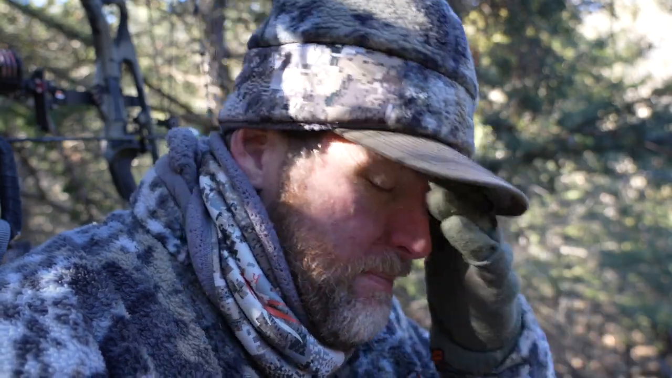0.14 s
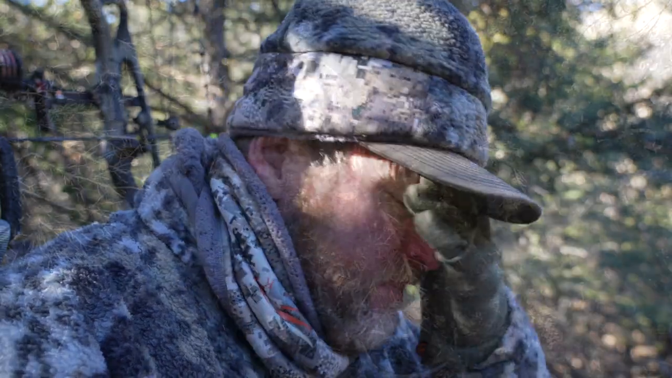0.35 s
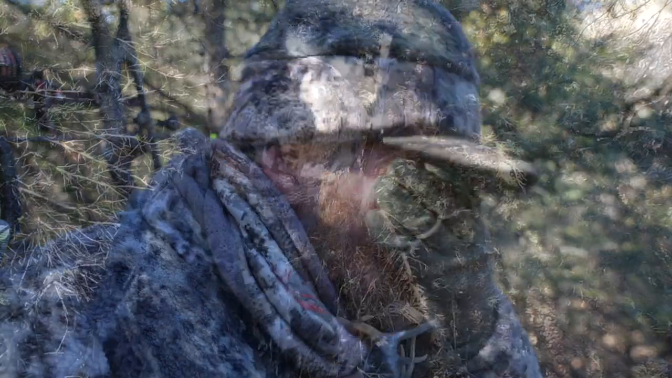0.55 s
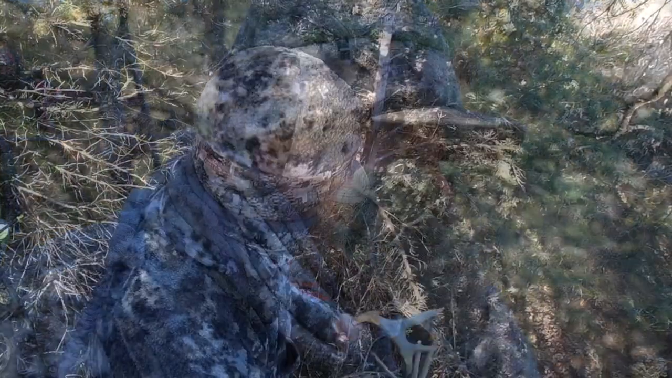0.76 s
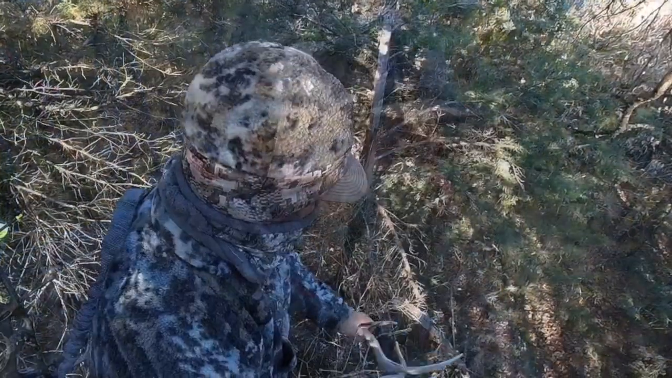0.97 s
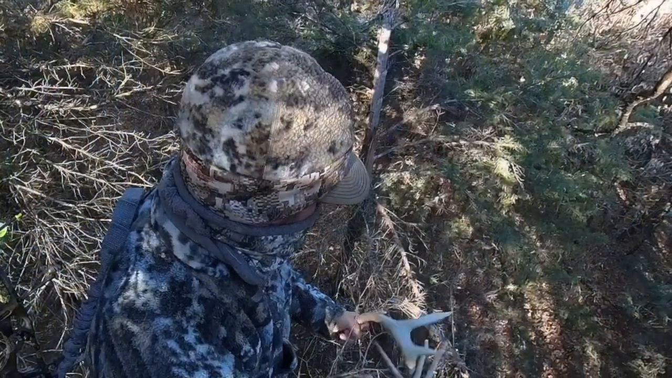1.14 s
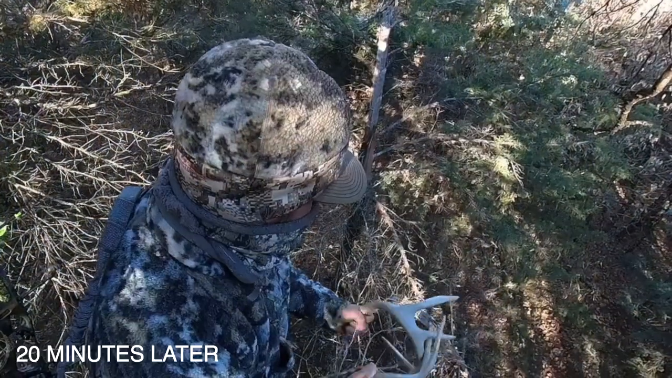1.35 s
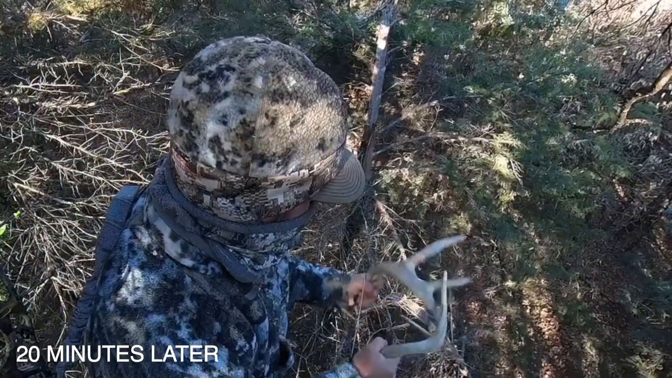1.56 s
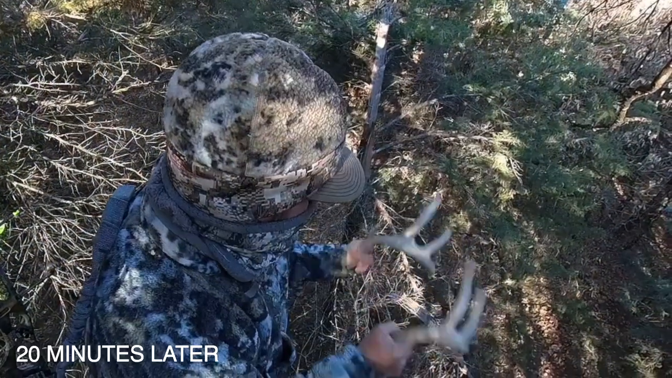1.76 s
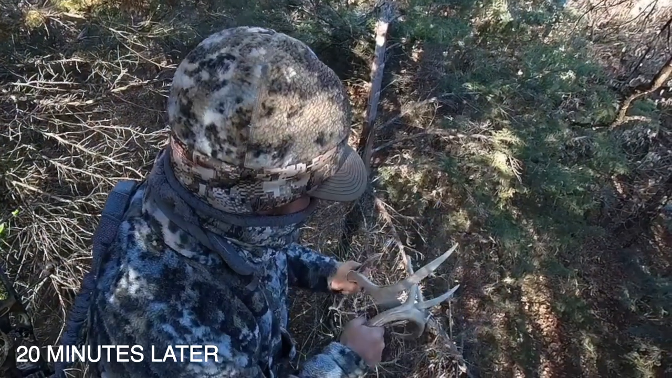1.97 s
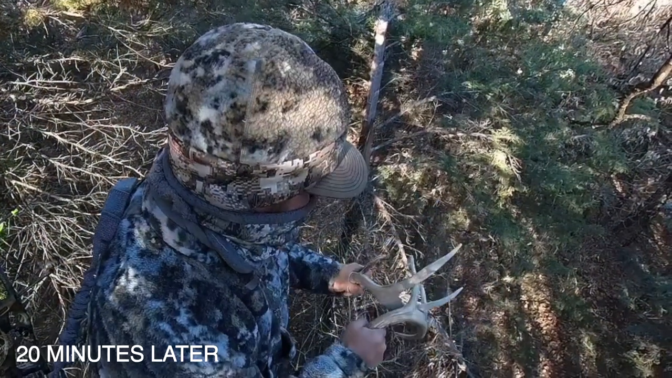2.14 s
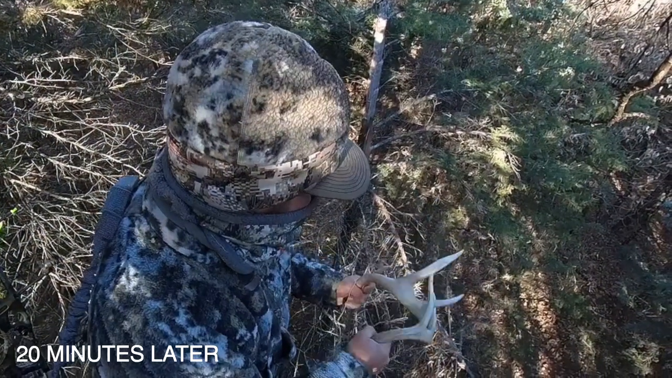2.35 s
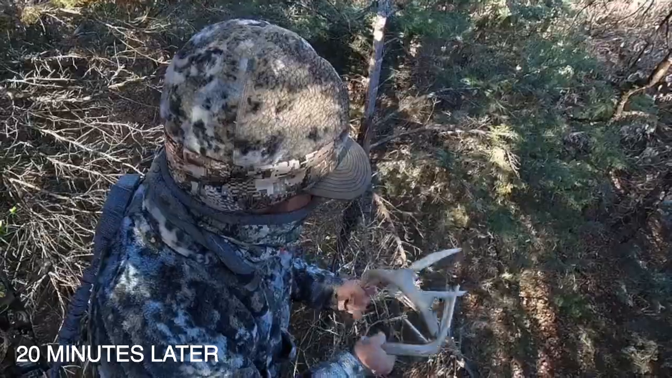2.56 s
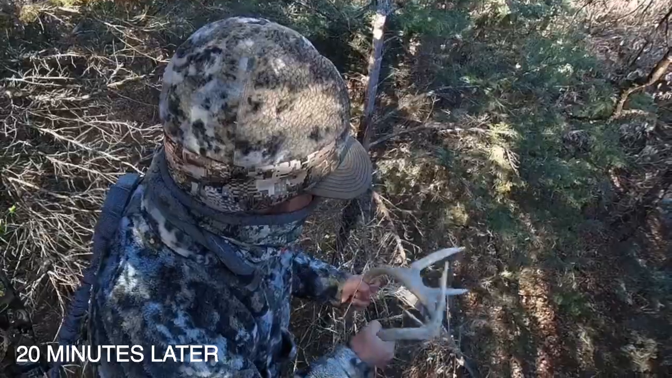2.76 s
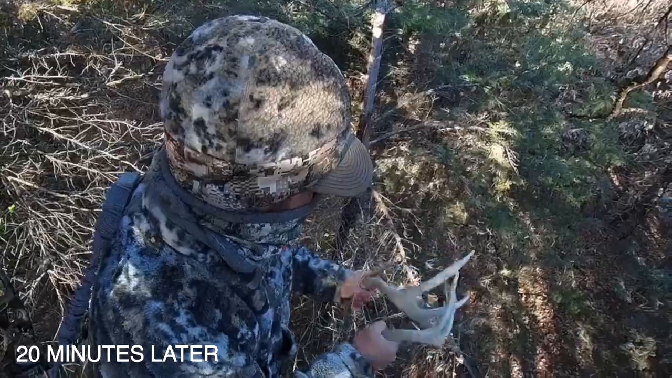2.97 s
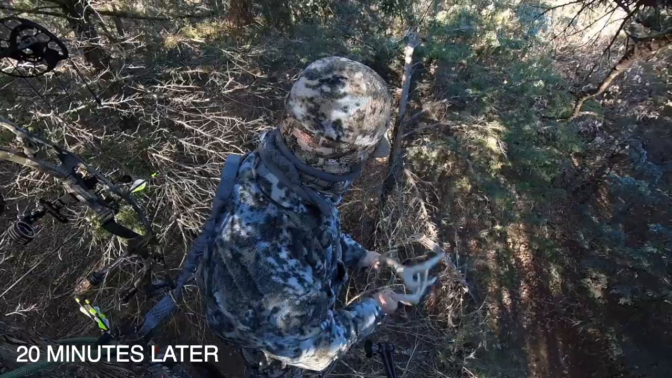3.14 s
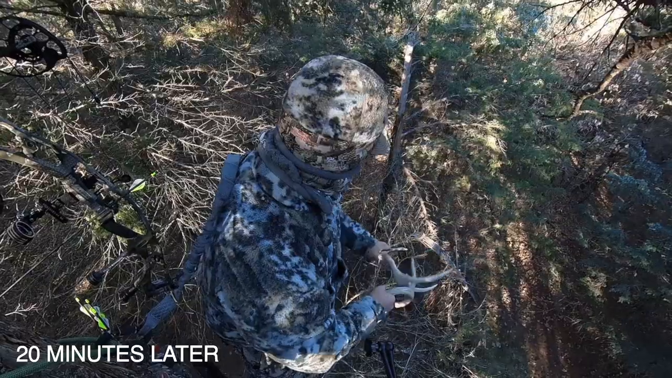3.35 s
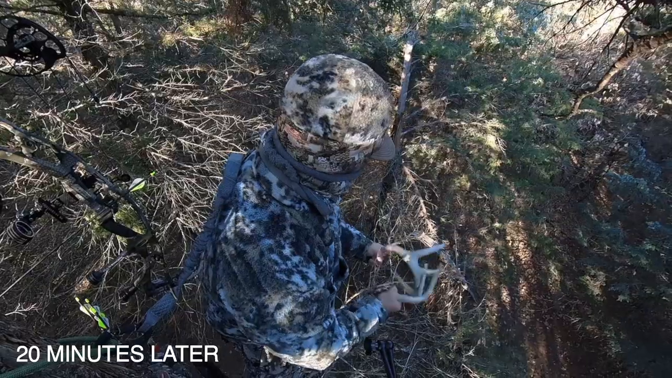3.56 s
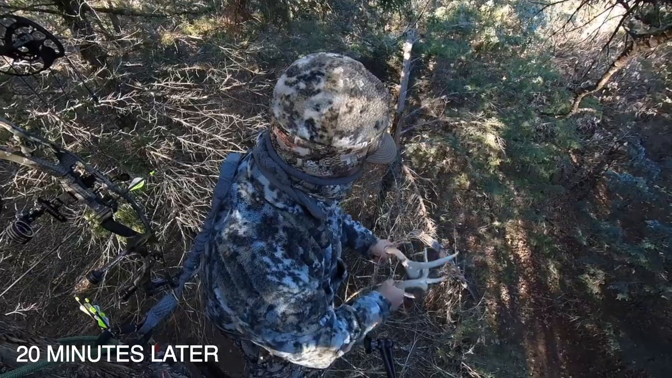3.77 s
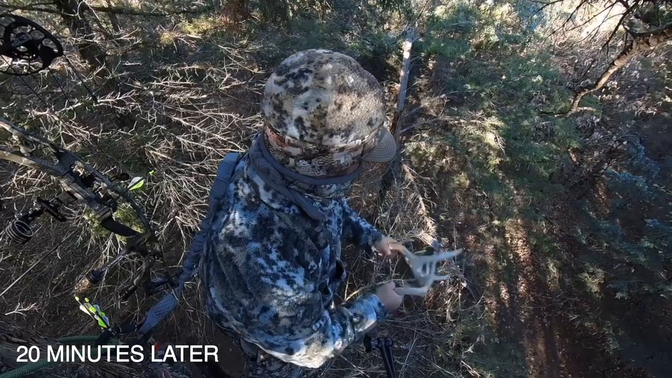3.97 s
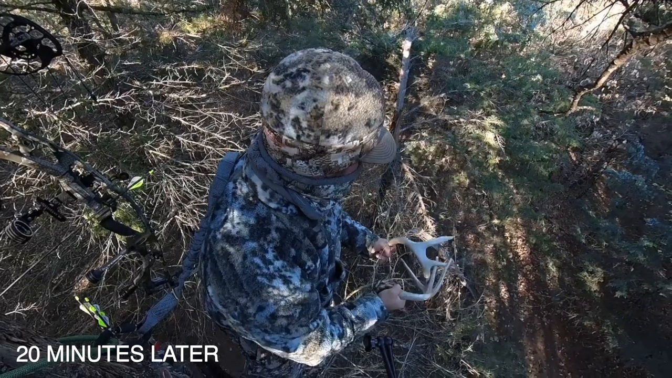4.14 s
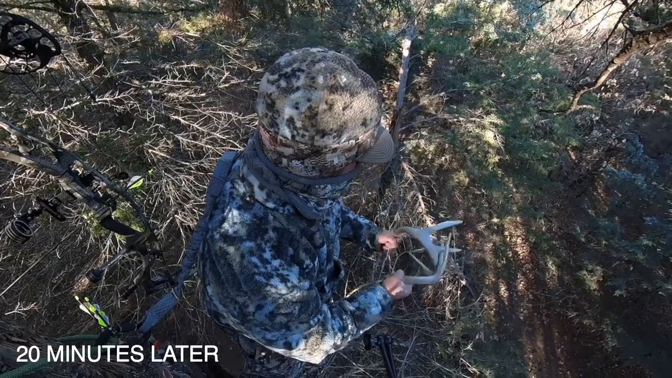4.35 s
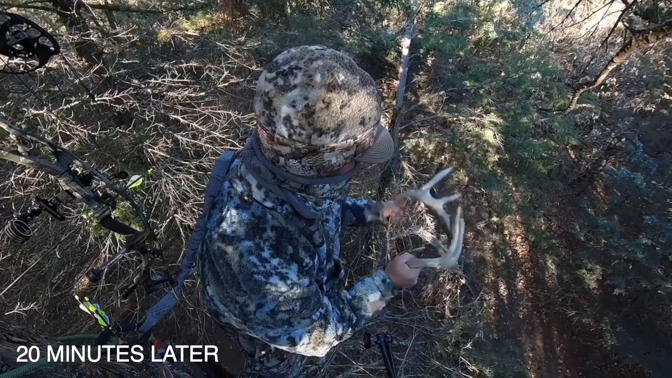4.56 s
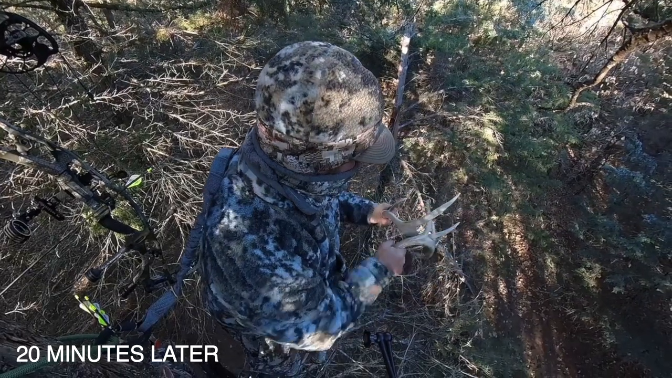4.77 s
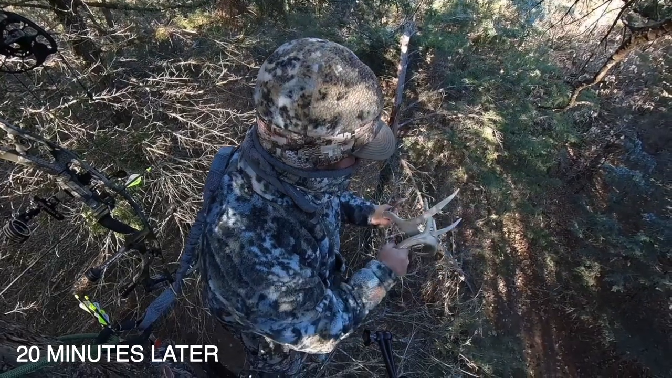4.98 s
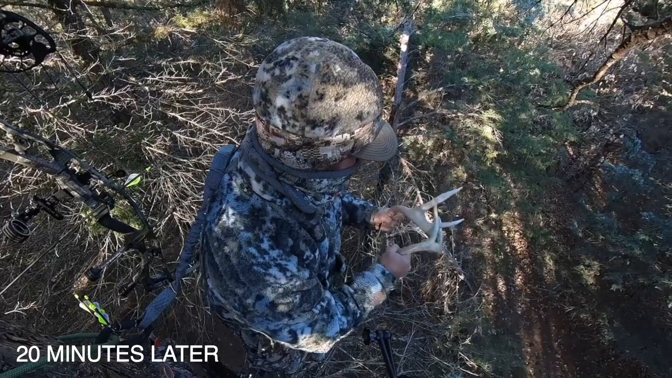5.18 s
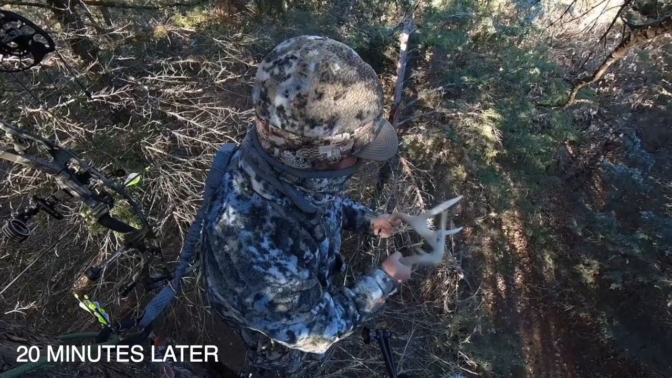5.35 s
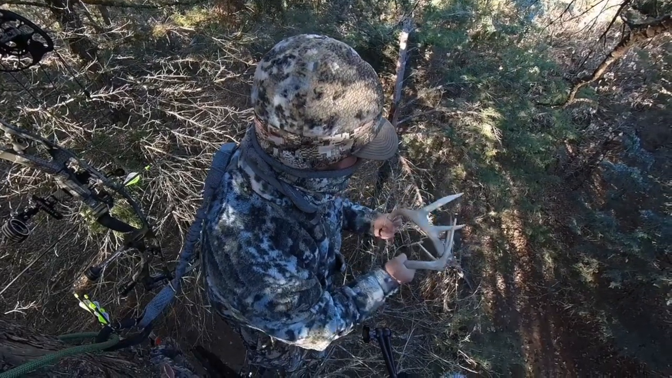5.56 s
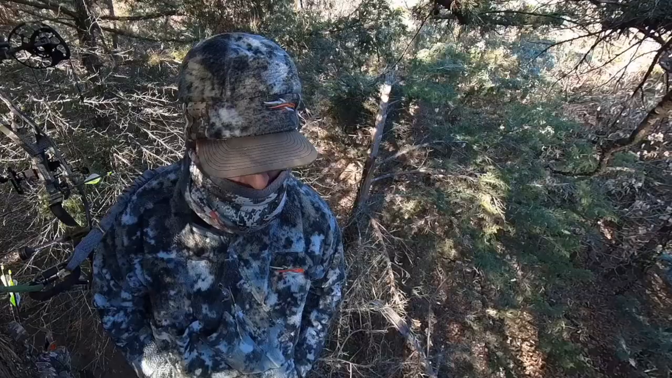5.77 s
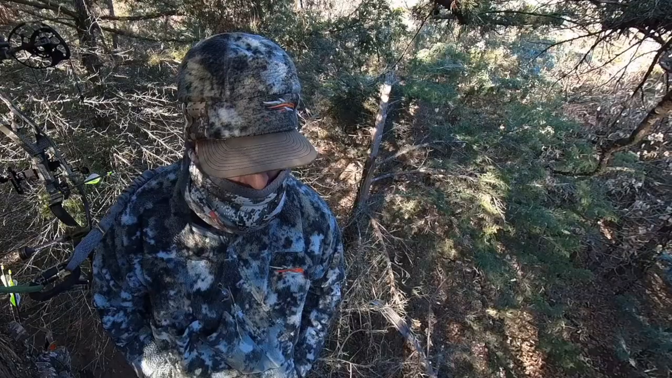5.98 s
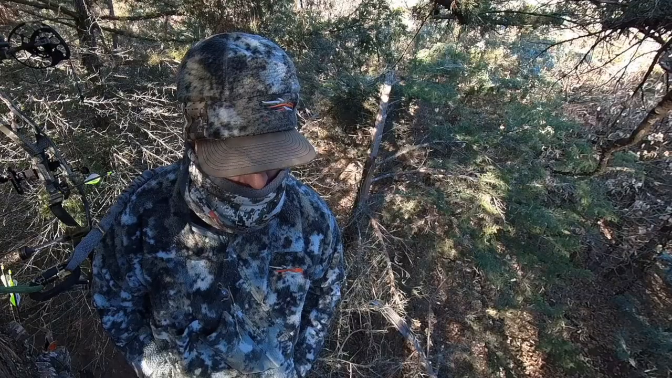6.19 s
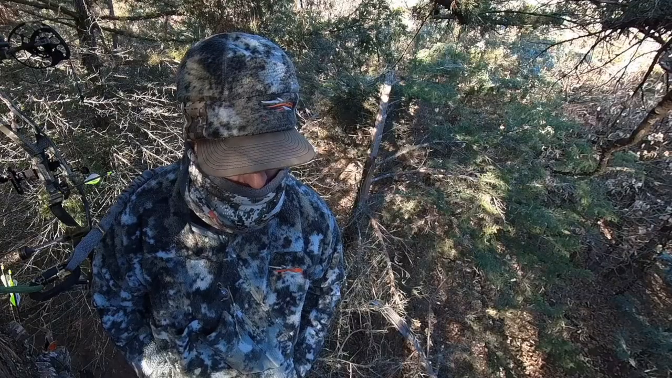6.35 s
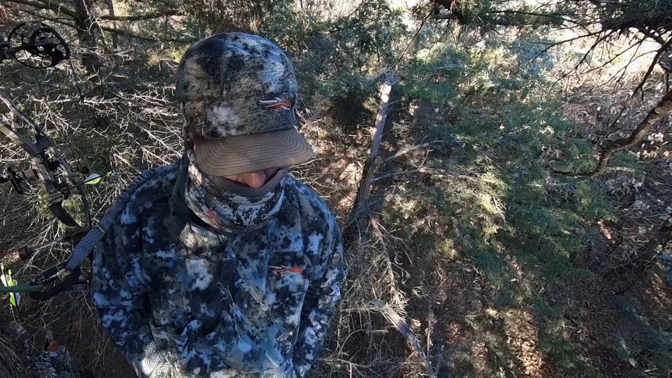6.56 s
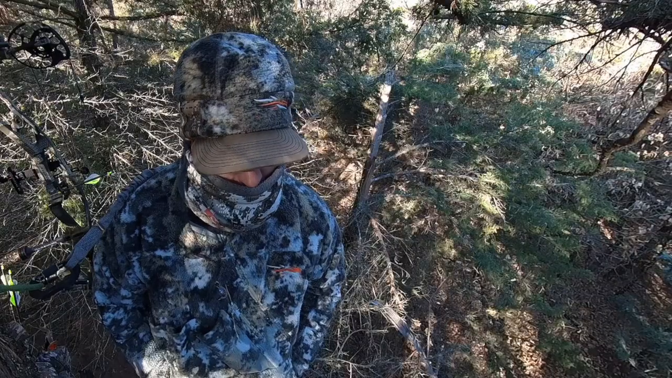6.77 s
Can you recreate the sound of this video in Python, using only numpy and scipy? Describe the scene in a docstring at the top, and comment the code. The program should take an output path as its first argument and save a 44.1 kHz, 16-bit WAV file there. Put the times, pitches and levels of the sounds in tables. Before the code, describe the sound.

Antlers clack and grind together up close in quiet woodland, first fading in through rustling cloth, then rattling harder before only soft wind and drone remain.

```python
"""Deer antlers rattled in woodland

Close to a small microphone, a pair of antlers is clacked and ground together in a quiet wood.
Each blow is a broad contact and a decaying chatter of ticks, which rings the modes of the bone.
Around it the trunks return a short noisy wash, over a far drone, a smooth hiss and a wind rumble.
Most of the flurry sounds twice, the first time fading in while a rustle of cloth, made of
filtered noise, fades out."""
import sys
import numpy as np
from scipy import signal
from scipy.fft import rfft, irfft, next_fast_len
from scipy.io import wavfile
from scipy.ndimage import uniform_filter1d, minimum_filter1d

SR = 44100
rng = np.random.default_rng(int(sys.argv[2]) if len(sys.argv) > 2 else 0)


def to_wav(s):
    """Save 16-bit WAV."""
    ch = np.atleast_2d(s).T  # columns
    pcm = np.round(np.clip(ch, -1, 1) * 32767)  # PCM
    wavfile.write(sys.argv[1], SR, pcm.astype(np.int16))


N = 300762


def undb(db):
    """Decibels to amplitude."""
    return 10 ** (np.asarray(db) / 20)


def curve(rows):
    """Columns of a (time_s, value, ..) table at every sample."""
    time_s, *columns = np.transpose(rows)
    return [np.interp(np.arange(N) / SR, time_s, column) for column in columns]


def colour(x, points):
    """Filter by (pitch_hz, level_db) points on a log-frequency axis."""
    size = next_fast_len(x.shape[-1])
    pitch_hz, level_db = np.transpose(points)
    bins_hz = np.arange(size // 2 + 1) * SR / size
    gain = undb(np.interp(np.log(bins_hz + 1), np.log(pitch_hz), level_db))
    return irfft(rfft(x, size) * gain, size)[..., :x.shape[-1]]


def noise(points):
    """Coloured noise of rms 1."""
    x = colour(rng.standard_normal(N), points)
    return x / x.std()


def walk(rate_hz):
    """Random levels joined by straight slopes, rate_hz of them a second; spread about a quarter."""
    hold = int(SR / rate_hz)
    steps = np.repeat(rng.standard_normal(N // hold + 1), hold)
    return 0.32 * uniform_filter1d(steps, hold)[:N]


def ring(pitch_hz, gains, t60_s, t):
    """Modes after one tick: decaying sines with t60_s at 3500 Hz; low modes last longer."""
    pitch_hz = np.c_[pitch_hz]
    decay = 1000. ** (-t / (t60_s * (3500 / pitch_hz) ** 0.14))
    return gains @ (np.sin(2 * np.pi * pitch_hz * t) * decay)


# stretches whose sounds are heard only once: start_s, end_s
HEARD_ONCE = [(0, 3.5), (3.75, 3.82), (3.96, 3.99), (4.015, 4.035), (4.28, 4.4)]


def hearing(start_s):
    """Row for a sound by its start: 0 for what sounds once, 1 for what sounds twice."""
    return int(not any(a <= start_s < b for a, b in HEARD_ONCE))


# each knock of antler on antler, close to the microphone:
# start_s, level_db, first_ring_hz, second_ring_hz, third_ring_hz, chatter_t60_ms (8 at least)
ANTLER_BLOWS = [(2.832, -51.5, 3560, 880, 5220, 16), (2.9125, -12, 5750, 2684, 4600, 32),
                (3.0033, -45, 6470, 3330, 4316, 20), (3.0228, -15, 6600, 3194, 4510, 22),
                (3.0325, -13, 4170, 6030, 3410, 35), (3.0746, -40, 6350, 4650, 3120, 23),
                (3.0951, -13.5, 6510, 4540, 3410, 39), (3.133, -31, 5700, 3810, 2524, 24),
                (3.1428, -12, 4630, 5270, 6090, 23), (3.1499, -11, 3540, 4225, 5290, 52),
                (3.1536, -17, 3480, 1890, 5100, 25), (3.1642, -5, 4580, 1760, 2830, 77),
                (3.1709, -9, 4470, 1670, 2574, 20), (3.1861, -27.5, 2150, 1350, 4450, 46),
                (3.2051, -14, 5880, 3770, 4960, 54), (3.2649, -27, 3310, 1837, 4620, 48),
                (3.3061, -11, 3510, 4330, 5100, 43), (3.3178, -20, 3580, 2515, 960, 20),
                (3.325, -13, 1980, 5120, 994, 49), (3.3535, -1, 4237, 3083, 1760, 43),
                (3.3706, -20, 2840, 1103, 1995, 80), (3.387, -4, 7090, 5605, 4060, 45),
                (3.3996, -13.5, 5030, 3570, 2000, 25), (3.4331, -40.5, 5950, 4040, 6770, 35),
                (3.4538, -10.5, 5920, 4040, 6600, 28), (3.465, -29, 5890, 4606, 3964, 20),
                (3.528, -14, 2297, 4580, 1260, 62), (3.5534, -16, 4730, 3494, 925, 25),
                (3.568, -3.5, 4740, 2200, 3690, 42), (3.578, -14.5, 6255, 4486, 5640, 12),
                (3.6932, -37.5, 2280, 3180, 1066, 19), (3.702, -40.5, 6310, 4414, 5850, 15),
                (3.7227, -9.5, 6486, 4433, 5910, 33), (3.7298, -20.5, 2390, 4765, 1743, 23),
                (3.7907, -11.5, 4640, 2750, 1954, 34), (3.7976, -8.5, 3900, 3575, 1730, 42),
                (3.9062, -38.5, 2620, 860, 4634, 40), (3.9173, -31.5, 2067, 940, 4260, 47),
                (3.9266, -12.5, 4505, 3550, 2326, 13), (3.9675, -18, 2900, 1874, 4350, 47),
                (3.9933, -27, 1530, 3290, 2338, 72), (4.002, -21, 2354, 4530, 1300, 73),
                (4.0056, -21, 5340, 2260, 4370, 16), (4.02, -18, 4320, 2830, 3650, 60),
                (4.0963, -45, 3093, 1452, 2410, 26), (4.1117, -36.5, 970, 2670, 2040, 40),
                (4.1156, -9.5, 2936, 4785, 2415, 44), (4.143, -13, 2564, 4516, 1754, 62),
                (4.1496, -5, 3694, 2370, 6100, 25), (4.1554, -13.5, 4175, 3155, 1744, 40),
                (4.1947, -36.5, 4145, 6045, 6560, 16), (4.2156, -10, 4224, 6083, 6730, 27),
                (4.2969, -15.5, 4540, 3550, 5930, 22), (4.8239, -33.5, 3770, 2297, 2760, 36),
                (4.8527, -29, 4670, 5690, 2990, 28), (4.8714, -8, 5706, 4800, 2800, 32),
                (4.8743, -4.5, 4977, 5680, 3494, 23), (4.888, -14, 3475, 5550, 5070, 56),
                (4.8924, -2, 3703, 2852, 5578, 4.3), (4.9007, -9, 4407, 2930, 3648, 27),
                (4.9122, -27.5, 3910, 4510, 2430, 25), (4.9329, -31.5, 4400, 2816, 2385, 27),
                (5.0817, -33.5, 2000, 4400, 2780, 45), (5.298, -11, 3735, 2937, 2010, 14),
                (5.306, -18, 5160, 4070, 1880, 17), (5.5375, -11.5, 6260, 4910, 5360, 23),
                (5.5453, -22.5, 3570, 2370, 4740, 82), (5.5529, -18.5, 5950, 2740, 4710, 29),
                (5.562, -28.5, 4560, 2700, 4000, 30), (5.6178, -17.5, 3990, 7420, 2840, 42),
                (5.646, -41.5, 2400, 3350, 1660, 37), (5.7496, -48.5, 3430, 960, 5200, 14)]
# modes of the two antlers, before each blow scatters them: pitch_hz, level_db
BONE_MODES = [(480, -6.5), (770, -3.5), (1040, 0.5), (1320, -4), (1730, -1), (1950, -1), (2300, 1),
              (2780, 4), (3290, -2), (3710, 0), (4230, -1), (4690, 0), (5250, -4.5), (5750, -10),
              (6600, -13), (7350, -17.5), (8100, -14.5)]
RING_GAINS_DB = (17, 13, 11)  # the three rings of the struck tines
TINE_RISE_S, TINE_T60_S = .0005, .0105  # rise to 63 %; t60 at 3500 Hz
BONE_T60_S = .014, .005  # at 3500 Hz: towards the microphone, towards the trees


def blows():
    """The struck tines ring loudest over the whole bone; the knobbly surfaces chatter on before they part.

    Axes: heard once or twice; towards the microphone, or drier and weaker in tine rings towards the trees."""
    out, t = np.zeros((2, 2, N + SR)), np.arange(SR // 16) / SR
    mode_hz, mode_db = np.transpose(BONE_MODES)
    tine_share = np.c_[[1, .15]]  # microphone, trees
    for start_s, level_db, *rings_hz, chatter_t60_ms in ANTLER_BLOWS:
        sign, level_scatter, pitch_scatter = rng.standard_normal((3, len(mode_hz)))
        tick_sign, tick_chance, contact = rng.standard_normal((3, len(t)))

        # modes next to a ring merge into it
        apart = np.abs(mode_hz / np.c_[rings_hz] - 1).min(0) > .08
        gains = apart * np.sign(sign) * undb(mode_db + 3.8 * level_scatter)
        scattered_hz = mode_hz * (1 + 0.041 * pitch_scatter)
        bone = [ring(scattered_hz, gains, t60_s, t) for t60_s in BONE_T60_S]
        tines = ring(rings_hz, undb(RING_GAINS_DB), TINE_T60_S, t) * (1 - np.exp(-t / TINE_RISE_S))

        # sparse ticks that die away, after one full first tick
        ticks = 0.27 * np.sign(tick_sign) * (tick_chance > 1.4)
        fall = 1000. ** (-1000 * t / max(chatter_t60_ms, 8))
        chatter = ticks * fall * (1 - np.exp(-t / 0.00058))
        chatter[0] = 1
        blow = signal.fftconvolve(bone + tine_share * tines, chatter[None])

        # the contact itself is broad and dry, and a larger share of a harder blow
        click = np.diff(contact * np.exp(-t / 0.0012))
        blow[:, 1:len(t)] += undb(18.0 + 0.42 * level_db) * click

        onset_rms = blow[:, :SR // 400].std(1, keepdims=True)
        at = int(start_s * SR)
        out[hearing(start_s), :, at:at + blow.shape[1]] += blow * undb(level_db) / (2.064 * onset_rms)
    return out[..., :N]


# tines rubbing along each other, mostly as they slide into a blow: end_s, level_db
TINE_RUBS = [(2.92, -49.5), (3.1, -60), (3.16, -49), (3.31, -50), (3.532, -56), (3.73, -49.5), (3.934, -39),
             (4.118, -47.5), (4.195, -51), (4.667, -57), (4.95, -40), (3.785, -56.5), (5.299, -50.5),
             (5.548, -48)]
RUB_LENGTH_S, RUB_T60_S = .05, .021  # t60 at 3500 Hz
SLIPS_PER_S = 1800


def grind():
    """Scattered small slips of uneven size ring all the modes of the bone faintly."""
    slip_size = rng.standard_normal(N) * undb(1.8 * rng.exponential(size=N))
    slips = (rng.random(N) < SLIPS_PER_S / SR) * slip_size
    mode_hz, mode_db = np.transpose(BONE_MODES)
    gains = undb(0.5 * mode_db - mode_hz / 800) * rng.standard_normal(len(mode_hz))
    response = ring(mode_hz, gains, RUB_T60_S, np.arange(SR // 20) / SR)
    rub = signal.fftconvolve(slips, response)[:N]

    pressure = np.zeros((2, N))
    for end_s, level_db in TINE_RUBS:
        start_s = end_s - RUB_LENGTH_S
        at, count = int(start_s * SR), int(RUB_LENGTH_S * SR)
        pressure[hearing(start_s), at:at + count] += undb(level_db) * np.hanning(count)
    return rub / rub.std() * uniform_filter1d(pressure, SR // 200)


# low double thumps from the recorder's gain control, under some of the blows: start_s, level_db
LOW_THUMPS = [(3.021, -36), (3.387, -36.5), (3.568, -33.5), (4.148, -34), (5.5382, -35.5)]
THUMP_S = .0115


def thumps():
    """A short upward pulse, a negative step that deepens at its end, then a return; kept to the lows."""
    steps = np.zeros((2, N))
    for start_s, level_db in LOW_THUMPS:
        row, at, end = steps[hearing(start_s)], int(start_s * SR), int((start_s + THUMP_S) * SR)
        row[at:at + 60] += 0.74 * undb(level_db)
        row[at + 60:end] -= 2.2 * undb(level_db)
        row[end - 70:end] -= 0.95 * undb(level_db)
    return signal.sosfilt(signal.butter(3, [42., 500.], "band", fs=SR, output="sos"), steps)


# dull rumbles as the grip shifts, and one short low knock at 4.874 s: start_s, length_s, pitch_hz, level_db
GRIP_SHIFTS = [(3.397, .04, 160, -48), (3.961, 0.1, 56, -56), (4.86, 0.076, 80.4, -47.5),
               (4.874, 0.034, 359, -41)]


def grip():
    """Short swells of low resonant noise, mostly carried through the hands."""
    out = np.zeros((2, N))
    for start_s, length_s, pitch_hz, level_db in GRIP_SHIFTS:
        resonance = signal.iirpeak(pitch_hz, 1.5, SR)
        low = signal.lfilter(*resonance, rng.standard_normal(SR // 4))[-int(length_s * SR):]
        low = low * np.hanning(len(low))
        at = int(start_s * SR)
        out[hearing(start_s), at:at + len(low)] = undb(level_db) * low / low.std()
    return colour(out, [(350, 0), (600, -31.0)])


NEAR_T60_S, NEAR_DB, WASH_RISE_S = 0.19, -13.5, 0.039
FAR_S, FAR_DB = 0.125, -32  # echoes of the trees further off keep coming this long


def trunks(x):
    """A wash of echoes from the near trees and a fainter, longer one from the far trees, as noise."""
    t = np.arange(SR // 2) / SR
    near_fall = undb(NEAR_DB) * 1000. ** (-t / NEAR_T60_S) / np.sqrt(NEAR_T60_S)
    far_fall = undb(FAR_DB) * np.exp(-(t / FAR_S) ** 2)
    wash = colour(rng.standard_normal(len(t)), [(300, -1), (1500, -8.5), (4000, -8.5), (8000, -12.0)])
    wash = wash / wash.std() * (near_fall + far_fall) * (1 - np.exp(-t / WASH_RISE_S))
    wash = wash * np.sqrt(2 * np.log(1000) / SR)  # evens out the energy of the decay
    return signal.fftconvolve(x, wash[None])[:, :N]


# wide hush of cloth near the microphone: pitch_hz, level_db (per Hz)
HUSH_COLOUR = [(35, -60), (60, -19.5), (330, -3.5), (698, -0.5), (1780, -8.5), (2410, -10), (6000, -15),
               (16000, -26)]
# resonances of the swish: pitch_hz, width_hz, level_db
SWISH_BANDS = [(2430, 490, 6.5), (4200, 660, 2.5), (5100, 130, 6.5), (6300, 270, -1)]
# single strokes of the swish: centre_s, half_length_s, level_db
SWISH_STROKES = [(0.039, 0.047, -47.5), (0.403, 0.02, -48.5), (0.472, 0.011, -40)]
HUSH_DB, HUSH_EXTRA_DB, HUSH_SETTLES_S, SWISH_DB = -47.5, 3.5, 0.045, -54  # extra at the start


def cloth():
    """Sleeve and glove brush against each other: a wide hush that settles and a fluttering swish."""
    t = np.arange(N) / SR
    swish = np.zeros(N)
    for pitch_hz, width_hz, level_db in SWISH_BANDS:
        band = signal.iirpeak(pitch_hz, pitch_hz / width_hz, SR)
        swish += undb(level_db) * signal.lfilter(*band, rng.standard_normal(N))
    strokes = undb(SWISH_DB)
    for centre_s, half_length_s, level_db in SWISH_STROKES:
        strokes = strokes + undb(level_db) * np.exp(-((t - centre_s) / half_length_s) ** 2)
    flutter = undb(6.2 * walk(124.3))
    hush = undb(HUSH_DB + HUSH_EXTRA_DB * np.exp(-t / HUSH_SETTLES_S)) * noise(HUSH_COLOUR)
    return hush + strokes * flutter * swish / swish.std()


# woodland air from start to end: time_s, drone_db, hiss_db, rumble_db
AIR_LEVELS = [(0, -64, -84, -95.5), (1.3, -66, -73, -67), (1.45, -74.5, -84, -77),
              (2.8, -69.5, -80.5, -78.5), (3.1, -61.5, -81, -70.5), (4.35, -69, -81.5, -76),
              (5.5, -65.5, -73.5, -67), (6.82, -66.5, -73, -65)]
# far drone: pitch_hz, level_db (per Hz)
DRONE_COLOUR = [(150, -30.5), (280, -9), (510, -0.5), (720, -0.5), (1100, -9), (1700, -24), (3000, -64)]
# smooth hiss: pitch_hz, level_db (per Hz)
HISS_COLOUR = [(500, -31), (1700, 0), (5800, 1), (9000, -15), (11500, -74)]
# low wind rumble: pitch_hz, level_db (per Hz)
RUMBLE_COLOUR = [(18, -34), (30, -11.5), (59, 1.5), (130, -4), (300, -12.5), (600, -44.5)]


def air():
    """A far drone with smooth hiss above it; under it a wind rumble that comes in small gusts."""
    drone_db, hiss_db, rumble_db = curve(AIR_LEVELS)
    drone = noise(DRONE_COLOUR) * undb(drone_db + 1.7 * walk(4))
    hiss = noise(HISS_COLOUR) * undb(hiss_db)
    rumble = noise(RUMBLE_COLOUR) * undb(rumble_db + 8.9 * walk(17))
    return drone + hiss + rumble


# the microphone's colour on the antlers and the trees, brighter towards 6.5 kHz, steeply dull above 9 kHz: #
# pitch_hz, level_db
RATTLE_COLOUR = [(100, -13.5), (6500, 5), (8000, -2), (9200, -20.5), (10000, -40), (16000, -56)]
EARLIER_S = 2.91959  # the first hearing comes this long before the times in the tables
CROSSFADE_S = 0.47, 0.98  # from the cloth to the first hearing of the rattle


def scene():
    """Antlers and their echoes, heard once or twice, over the air; the cloth fades out early on."""
    near, around = np.swapaxes(blows(), 0, 1) + grind()
    single, twice = colour(near + trunks(around), RATTLE_COLOUR) + thumps() + grip()
    lead = int(EARLIER_S * SR)
    first_hearing = np.append(twice[lead:], np.zeros(lead))
    fade = np.interp(np.arange(N) / SR, CROSSFADE_S, [0, 1])
    rattle = single + twice + first_hearing * fade
    mono = rattle + air() + cloth() * (1 - fade) ** 1.09
    return np.tile(mono, (2, 1))  # one capsule feeds both channels


LIMIT_DB, LIMIT_RATIO, TOP_HZ = -8, 2., 15900


def record(dry):
    """A fast limiter eases the hardest blows; the top is cut steeply."""
    reach = SR // 400
    peaks = -minimum_filter1d(-np.abs(dry), reach)
    envelope = uniform_filter1d(peaks, reach)
    gain = np.maximum(envelope / undb(LIMIT_DB), 1) ** (1 / LIMIT_RATIO - 1)
    return signal.sosfilt(signal.ellip(10, .2, 70, TOP_HZ, fs=SR, output="sos"), dry * gain)


dry = scene()
out = record(dry)
to_wav(out)
```